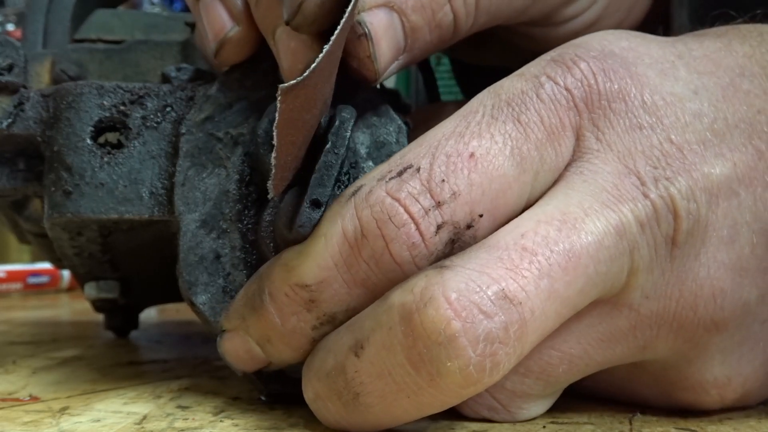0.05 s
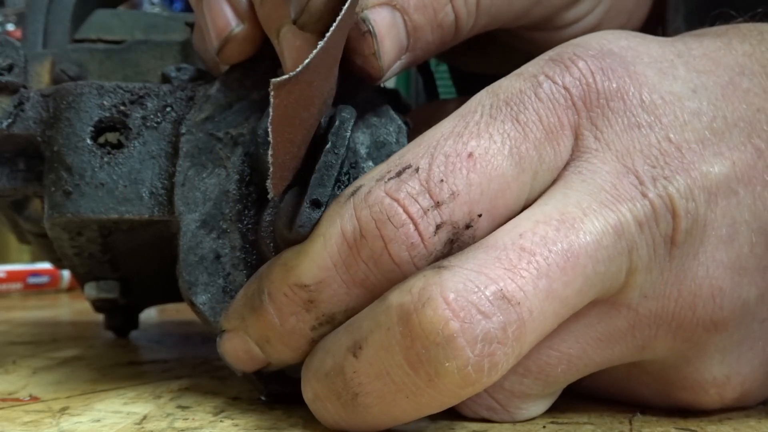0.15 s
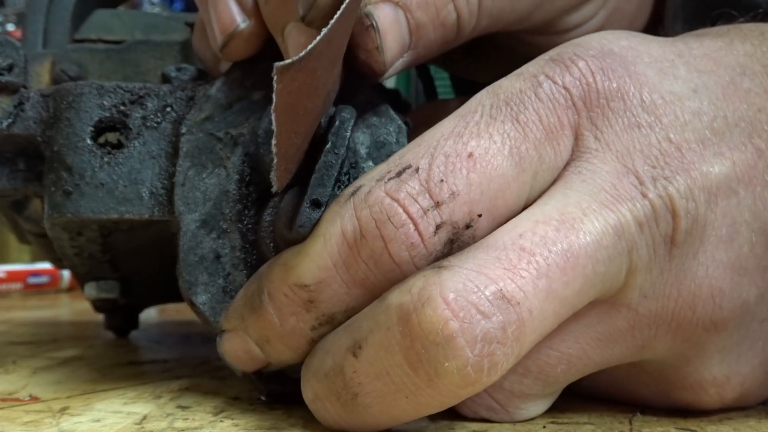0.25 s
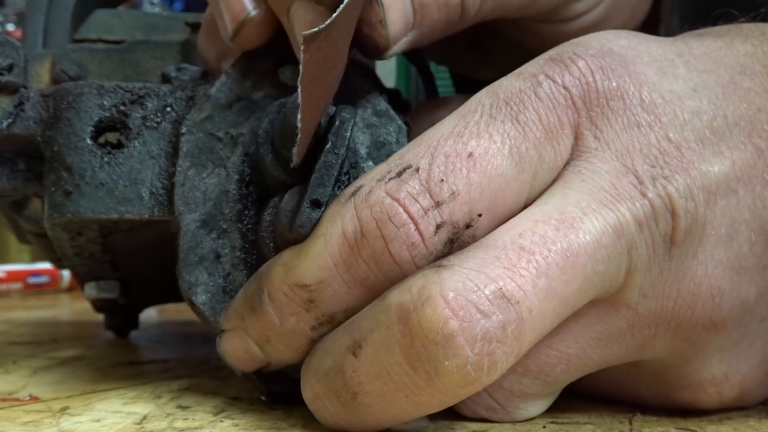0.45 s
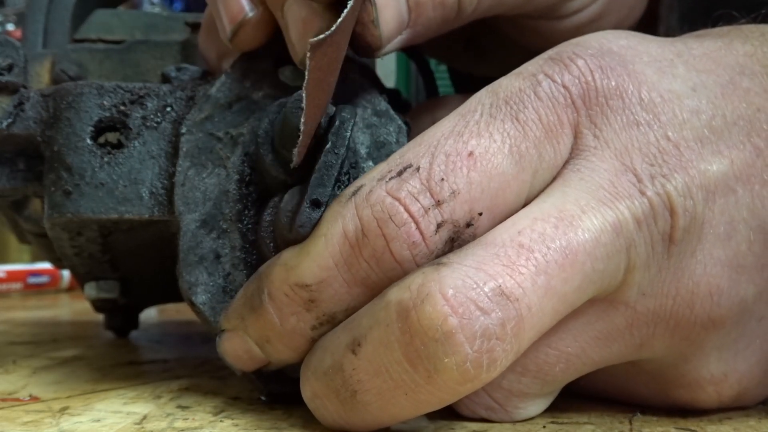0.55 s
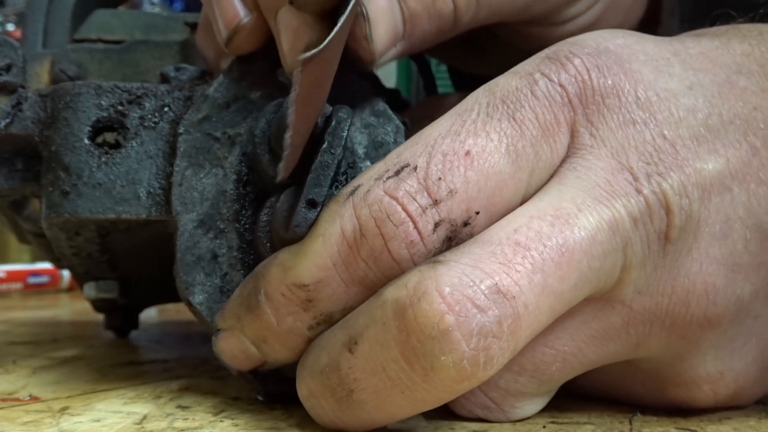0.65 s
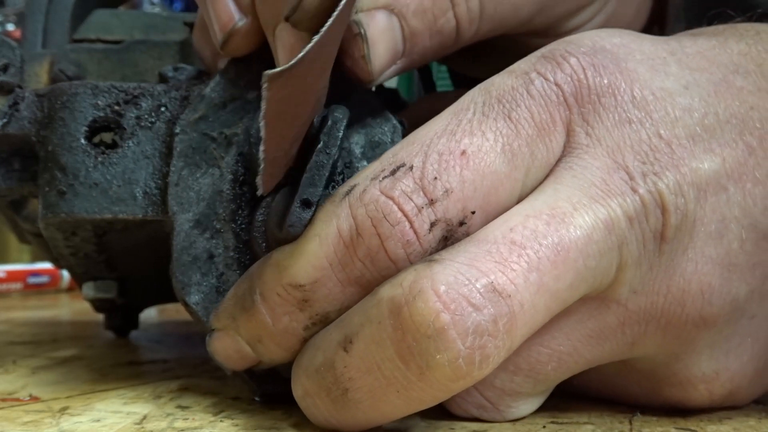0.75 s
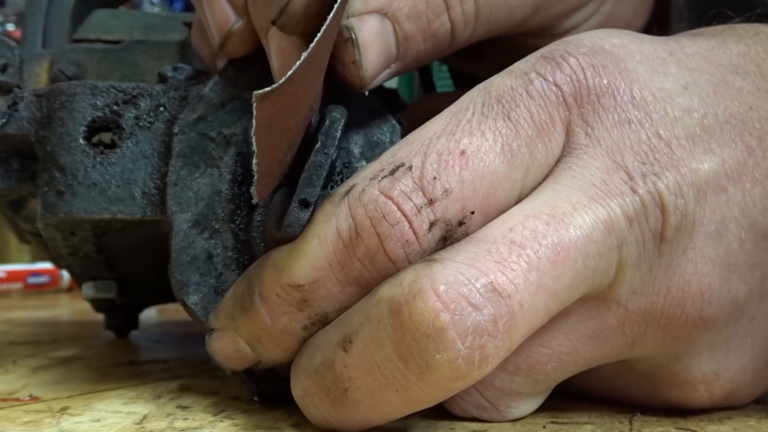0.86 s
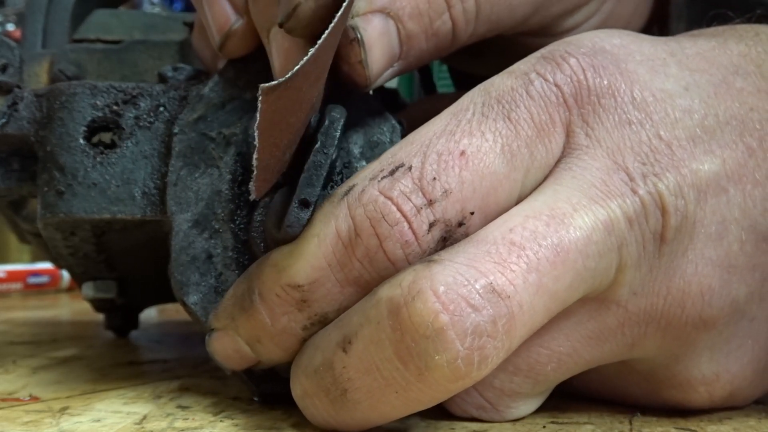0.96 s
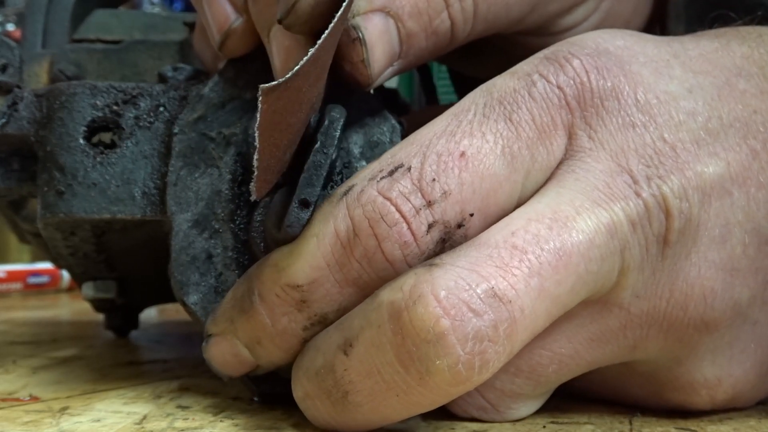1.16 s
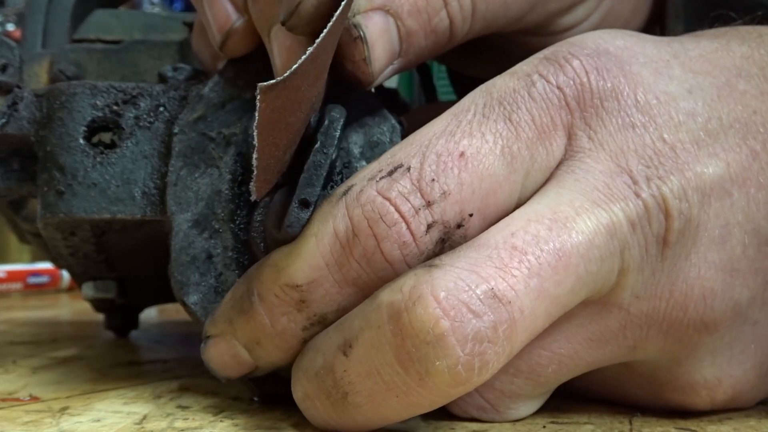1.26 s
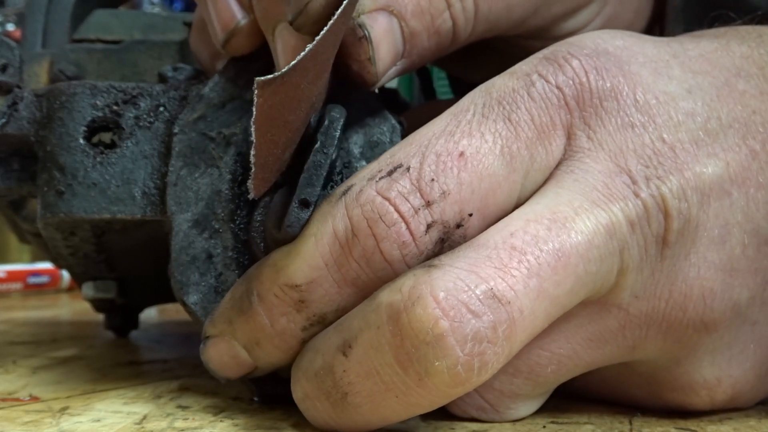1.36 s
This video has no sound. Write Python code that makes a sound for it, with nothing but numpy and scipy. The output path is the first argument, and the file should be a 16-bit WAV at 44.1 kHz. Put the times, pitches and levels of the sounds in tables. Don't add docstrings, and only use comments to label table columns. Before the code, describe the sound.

Gritty sandpaper rubs small steel engine contacts, a rough burst then a softer stroke back.

```python
import sys
import numpy as np
from scipy import signal
from scipy.fft import rfft, irfft, next_fast_len
from scipy.io import wavfile
from scipy.ndimage import uniform_filter1d

SR = 44100
rng = np.random.default_rng(int(sys.argv[2]) if len(sys.argv) > 2 else 0)


def to_linear_factor(level_db):
    exponent = np.asarray(level_db, float) / 20
    return 10 ** exponent


def bounce(signal):
    frames = np.transpose(np.atleast_2d(signal))
    limited = np.clip(frames, -1, 1)
    pcm = np.round(limited * 32767).astype(np.int16)
    wavfile.write(sys.argv[1], SR, pcm)


N = 61739


def level(x):
    return x / np.sqrt(np.mean(x ** 2))


def curve(table, hz):
    points = np.array(table, float)
    return np.interp(np.log(np.maximum(hz, 1)), np.log(points[:, 0]), points[:, 1])


def shape(x, gain):
    size = x.shape[-1]
    n = next_fast_len(2 * size)
    hz = np.arange(n // 2 + 1) * SR / n
    return irfft(rfft(x, n) * gain(hz), n)[..., :size]


def ring(x, modes):
    out = 0
    for hz, db, t60 in modes:
        decay = np.log(1000) / (max(t60, .003) * SR)
        pole = np.exp(2j * np.pi * hz / SR - decay)
        out = out + to_linear_factor(db) * signal.lfilter([1], [1, -pole], x + 1e-18).imag
    return out


def walk(rate_hz):
    hold = int(SR / rate_hz)
    steps = np.repeat(rng.standard_normal(N // hold + 1), hold)
    return level(uniform_filter1d(steps, hold)[:N])


def span(start):
    return slice(int(start * SR) - 256, int(start * SR) + 6000)


# frequency in Hz, density in dB per Hz.
ROOM_TONE = [(34, -24), (57, -6), (180, -14), (520, -14), (640, -22), (1060, -21), (1450, -33), (6000, -38)]
# frequency in Hz, side over mid in dB.
ROOM_TONE_SIDE = [(60, -33), (110, -42), (200, -18), (380, -14.5), (700, -6), (1290, -2.5), (2380, 0.5),
                  (4400, 3.5), (8120, -0.5), (15000, 0.5)]
# frequency in Hz, level in dB, t60 in seconds.
HUM_RING = [(485, -3, .1), (530, 0, .14), (55, -5, .3)]
# time in seconds, hum level in dB.
HUM_LOAD = [
    (0, -7.5),
    (.5, 1),
    (.95, 0),
    (1.4, 1.5),
]
SHOP_DB, SHOP_RING_DB, HUM_DB = -54, -8, -5
HUM_HZ, HUM_DRIFT = 473, .004
FLICKER_DB, HISS_TOP_HZ = .9, 8300


def shop():
    air = 0
    for hz in 25 * 2. ** np.arange(0, 10):
        def band(f):
            octave = np.cos(np.pi / 2 * np.clip(np.log2(np.maximum(f, 1) / hz), -1, 1))
            return octave * to_linear_factor(curve(ROOM_TONE, f)) / (1 + (f / HISS_TOP_HZ) ** 2)

        mid = shape(rng.standard_normal(N), band)
        side = shape(rng.standard_normal(N), lambda f: band(f) * to_linear_factor(curve(ROOM_TONE_SIDE, f)))
        air = air + to_linear_factor(FLICKER_DB * walk(9.52)) * np.array([mid + side, mid - side])
    stirred = level(ring(rng.standard_normal(N), HUM_RING))
    load_db = np.interp(np.arange(N) / SR, *np.transpose(HUM_LOAD))
    phase = 2 * np.pi * np.cumsum(HUM_HZ * (1 + HUM_DRIFT * walk(8.2))) / SR
    hum = to_linear_factor(2 * walk(9.64) + load_db) * np.sin(phase)
    return to_linear_factor(SHOP_DB) * (level(air) + to_linear_factor(SHOP_RING_DB) * stirred + to_linear_factor(HUM_DB) * hum)


# start in seconds, rise in seconds, hold in seconds, grit level in dB, brightness in dB per octave.
CATCHES = [(0.226, 0.0035, 0.0018, -56.5, -3), (0.2327, 0.00045, 0.0012, -42, 0.5),
           (0.237, 0.0011, 0.0026, -49, 2.5), (0.2453, .0006, 0.0015, -39.5, 0.5),
           (0.253, 0.0024, .006, -69, 1), (0.261, 0.0026, 0.0059, -51, 1.5),
           (0.2765, 0.0007, 0.0034, -42.5, 0.5), (.283, 0.00092, 0.0034, -50, 0),
           (0.3073, .0008, 0.0021, -42, 5), (0.3121, 0.00068, 0.0036, -42.5, -0.5),
           (0.325, .001, .005, -61.5, -8.5), (0.3416, .0004, 0.00055, -43.5, 3),
           (0.3657, 0.00058, 0.0024, -44.5, 1.5), (0.374, 0.00058, .004, -53, 0.5),
           (0.3943, 0.0005, 0.0034, -36, 2), (0.4, 0.0014, 0.0077, -37.5, 2),
           (.4075, .001, 0.0041, -33, -1.5), (.414, .001, 0.0053, -34.5, -0.5),
           (0.426, 0.00076, 0.005, -41.5, -2.5), (0.431, 0.00036, 0.0014, -39, 2.5),
           (0.436, 0.00078, .005, -52, 8), (0.4426, 0.00061, 0.006, -46, -7),
           (0.45, 0.0011, 0.0045, -57, 11), (0.4601, 0.00043, 0.0022, -36.5, 3),
           (0.4636, 0.00075, 0.0037, -35.5, -2.5), (0.468, 0.00085, 0.0042, -54, 2.5),
           (0.479, 0.0014, 0.025, -67.5, -8), (0.647, 0.0072, 0.0053, -52, -4),
           (0.662, 0.0033, 0.0042, -48.5, -2.5), (0.666, 0.0028, 0.011, -49, -1.5),
           (.682, .003, 0.011, -47.5, -0.5), (0.698, .002, 0.0062, -49, -2),
           (0.704, 0.00091, 0.006, -48, 1), (0.711, 0.00082, 0.013, -50.5, 2.5),
           (.729, 0.0017, 0.01, -56.5, 3), (0.742, 0.0046, .018, -58.5, -1.5),
           (.766, .0006, 0.0017, -57, 4), (0.771, .004, 0.054, -61.5, -1), (0.8293, .001, 0.0011, -55, 2.5),
           (0.836, 0.0049, 0.034, -66.5, -0.5)]
GRAINS_PER_S, GRAIN_SPREAD_DB = 16000, 1.5
RELEASE_S, CHATTER_DB = 0.0025, 1.5


def grit():
    t = np.arange(N) / SR
    sizes = to_linear_factor(GRAIN_SPREAD_DB * rng.exponential(size=(2, N))) * rng.standard_normal((2, N))
    struck = rng.random((2, N)) < GRAINS_PER_S / SR
    grains = level(sizes * struck * to_linear_factor(CHATTER_DB * walk(400)))
    out = np.zeros((2, N))
    for start, rise, hold, db, tilt_db in CATCHES:
        at = span(start)
        since = t[at] - start
        up = np.clip(since / max(rise, 2e-4), 0, 1)
        gate = up * np.exp(-np.maximum(since - rise - max(hold, 0), 0) / RELEASE_S)

        def tilt(f):
            return to_linear_factor(np.clip(tilt_db, -5, 6) * np.log2(np.maximum(f, 500) / 4000))

        out[:, at] += to_linear_factor(db) * shape(grains[:, at] * gate, tilt)
    return out


# frequency in Hz, density in dB per Hz.
PAPER = [(530, -52), (900, -57), (1260, 8.5), (1720, -6.5), (3820, 6.5), (4410, -1), (6030, 0),
         (16000, -14)]
PAPER_BACK = [(530, -31), (900, 2), (1030, -50), (1160, 4), (1720, -11.5), (2190, -7.5), (3260, -7.5),
              (16000, -19)]
# frequency in Hz, width in Hz, level in dB.
STEEL = [(1275, 68, 11), (1516, 210, 4), (2250, 75, 10), (2520, 97, 11.5), (2880, 80, 8), (3680, 25, -14),
         (3890, 77, 2.5), (4800, 80, -9), (6150, 39, -15), (6200, 72, -2), (7040, 88, -16), (8040, 200, -4),
         (8650, 190, -12)]
STEEL_BACK = [(1200, 110, 4), (1280, 86, -1.5), (1610, 80, 1.5), (2250, 95, 0), (2530, 120, 2),
              (3000, 60.3, 3), (4020, 97, 0), (4700, 64, -4.5), (6700, 150, -4)]
STEEL_DB, STEEL_WIDEN, STEEL_LOW_HZ = -3.5, 1.48, 940
TURN_S = .6


def scratch(force, paper, steel):
    def colour(f):
        return to_linear_factor(curve(paper, f)) / (1 + (1000 / np.maximum(f, 1)) ** 6)

    hiss = shape(force, colour) / np.sqrt(np.mean(colour(np.arange(1, SR // 2)) ** 2))
    modes = []
    for hz, width, db in steel:
        wide = width * STEEL_WIDEN
        modes.append((hz, db + 20 * np.log10(wide), np.log(1000) / np.pi / max(wide, 150)))
    unit = ring(np.arange(4096) == 0, modes)
    rung = shape(ring(force, modes), lambda f: f ** 4 / (f ** 4 + STEEL_LOW_HZ ** 4))
    return hiss + to_linear_factor(STEEL_DB) * rung / np.sqrt(np.sum(unit ** 2))


def strokes(force):
    back = np.arange(N) > TURN_S * SR
    return scratch(force * ~back, PAPER, STEEL) + scratch(force * back, PAPER_BACK, STEEL_BACK)


def burst(t, start, db, ms, hz, skew):
    swell = np.sin(np.pi * np.clip((t - start) * 1000 / ms, 0, 1) ** skew) ** 2
    return to_linear_factor(db) * swell / (ms * SR / 4000) * np.sin(2 * np.pi * hz * (t - start))


def bandpass(x, lo_hz, hi_hz):
    return signal.sosfilt(signal.butter(2, [lo_hz, hi_hz], "band", fs=SR, output="sos"), x)


# start in seconds, level in dB, favoured pitch in Hz.
THUMPS = [(.234, -38.5, 135), (0.236, -32, 58), (.265, -37, 155), (0.301, -26.5, 98), (0.328, -37, 135),
          (0.365, -39, 237), (0.39, -35, 132), (0.412, -24, 98), (.44, -53, 59.4), (.430, -30.5, 241),
          (0.458, -33, 164), (0.493, -53, 241.2), (0.497, -9, 58.7), (0.526, -45, 126), (0.653, -53, 173),
          (0.665, -29.5, 173), (.682, -41, 173), (0.699, -38, 244), (0.729, -71, 240), (0.763, -41.5, 268),
          (0.795, -38, 158), (.830, -40, 79)]
# frequency in Hz, level in dB, t60 in seconds.
BENCH = [(56, -31, 0.14), (98, -14, 0.092), (142, -12, 0.37), (173, -2, 0.072), (240.5, -13.5, 0.68),
         (255.6, -13, 0.23)]
BENCH_SHAKE_DB, BENCH_LO_HZ, BENCH_HI_HZ = -32.5, 56.4, 295
ROCK_CYCLES, FAVOUR_OCT = 2, .22


def bench_thumps(force):
    t = np.arange(N) / SR
    rocks = np.array([burst(t, s, db, 1000 * ROCK_CYCLES / hz, hz, 1) for s, db, hz in THUMPS])
    pitches = np.array(THUMPS)[:, 2]
    out = 0
    for mode in BENCH:
        share = np.exp(-.5 * (np.log2(pitches / mode[0]) / FAVOUR_OCT) ** 2)
        out = out + ring(share @ rocks + to_linear_factor(BENCH_SHAKE_DB) * force, [mode])
    return bandpass(out, BENCH_LO_HZ, BENCH_HI_HZ)


# start in seconds, ring level in dB, shudder length in milliseconds, pitch in Hz.
JOLTS = [(.2358, -24.5, 2.15, 490), (.2440, -25, 1.45, 521), (.244, -25, 13.5, 513.4),
         (.263, -40, 4.4, 528), (.278, -36, 1.8, 390), (.284, -36.5, 2.7, 502), (.307, -28, 1.66, 500),
         (0.315, -34, 2.5, 400), (.327, -40.5, 5, 478), (0.348, -39, 3.7, 450), (.366, -39.5, 3.6, 427),
         (.394, -24, 1.7, 512), (.404, -27, 6.5, 449), (.412, -26, 7.4, 456), (.418, -41, 2.1, 431),
         (0.4242, -14, 20, 491), (.4428, -28.5, 13.4, 487), (.4616, -21.5, 2.8, 520),
         (.4654, -38, 4.9, 518), (.485, -30.5, 17, 493), (.512, -39, 2.5, 468), (.54, -46, 9.5, 480),
         (0.653, -44, 1.7, 480), (.662, -37.5, 8.5, 483), (.670, -33, 12.3, 521),
         (.683, -21.5, 30.6, 484.7), (.712, -33, 24.5, 474), (.744, -42, 8.6, 510), (.757, -42, 11, 488),
         (.767, -44, 3, 492), (.797, -36.5, 4.2, 527), (0.811, -50, 3.3, 496), (0.8296, -43.5, 1, 483),
         (.855, -45.5, 4.7, 507)]
# frequency in Hz, level in dB, t60 in seconds.
CASTING = [(376, -12, 0.042), (497, -2, 0.052), (537.5, -12, 0.081), (609, -16.5, 0.056)]
SHAKE_DB, CASTING_LO_HZ, CASTING_HI_HZ = 0.5, 388, 610
SHUDDER_HZ = 496.1
SHUDDER_SKEW = 0.58


def casting_jolts(force):
    t = np.arange(N) / SR
    shudders = np.zeros(N)
    for start, db, ms, hz in JOLTS:
        at = span(start)
        held = [(f * hz / SHUDDER_HZ, mode_db, t60) for f, mode_db, t60 in CASTING]
        shudders[at] += ring(burst(t[at], start, db, max(ms, .5), hz, SHUDDER_SKEW), held)
    shaken = ring(to_linear_factor(SHAKE_DB) * force / 10, CASTING)
    return bandpass(shudders + shaken, CASTING_LO_HZ, CASTING_HI_HZ)


ROOM_T60_S, ROOM_DB, EARLY_T60_S, EARLY_DB = 0.58, -13.5, 0.066, -6.5


def room(x):
    t = np.arange(SR // 2) / SR

    def fade(t60):
        noise = rng.standard_normal((2, len(t))) * (t > .0003)
        return noise * to_linear_factor(-60 * t / t60) / np.sqrt(t60 * SR / 14)

    echoes = to_linear_factor(ROOM_DB) * fade(ROOM_T60_S) + to_linear_factor(EARLY_DB) * fade(EARLY_T60_S)
    return signal.fftconvolve(x[None], echoes)[:, :N]


# frequency in Hz, left over right in dB.
PORT_BALANCE = [(60, -16), (110, -4), (200, 3), (380, -6), (700, -4), (1290, 4.5), (2380, 0.5), (4400, 6),
                (8120, 2), (15000, -3)]
# frequency in Hz, lead of the left in radians.
PORT_PHASE = [(700, 0.091), (1300, 1.1), (2070, 0.32), (2840, 1.6), (4300, 0.17), (9000, 1.06),
              (15000, 1.3)]
THUMP_SIDE_DB, THUMP_SIDE_HZ = -20.5, 600
SPREAD_DB, SPREAD_HZ = -7, 4500


def scene():
    background = shop()
    force = grit()
    high, other = strokes(force)
    low = bench_thumps(force[0]) + casting_jolts(force[0])

    def half(f):
        return to_linear_factor(curve(PORT_BALANCE, f) / 2) * np.exp(.5j * curve(PORT_PHASE, f))

    near = np.array([shape(high, half), shape(high, lambda f: 1 / half(f))])
    side = shape(low, lambda f: to_linear_factor(THUMP_SIDE_DB) * f / THUMP_SIDE_HZ * np.exp(.9j))
    side = side + shape(other, lambda f: to_linear_factor(SPREAD_DB) * f / np.hypot(f, SPREAD_HZ))
    return near + np.array([low + side, low - side]) + room(high) + background


def top_cut(x):
    return signal.sosfilt(signal.butter(12, 16310, fs=SR, output="sos"), x)


def record(dry):
    low_pass = signal.ellip(8, .2, 60, 15700, fs=SR, output="sos")
    mix = signal.sosfilt(low_pass, dry)
    return top_cut(mix)


dry = scene()
out = record(dry)
bounce(out)
```